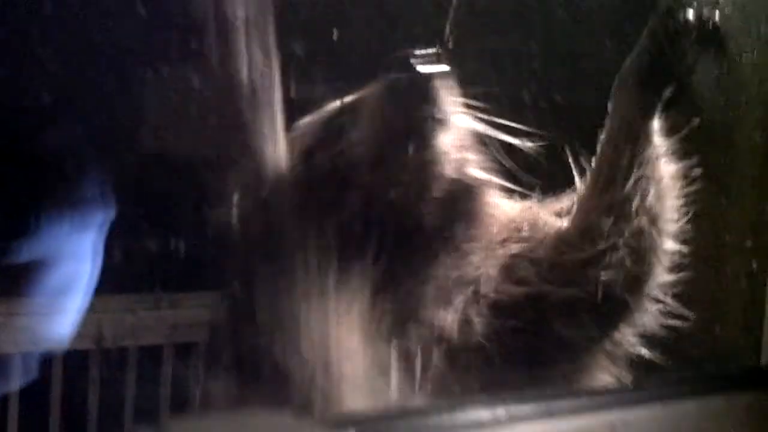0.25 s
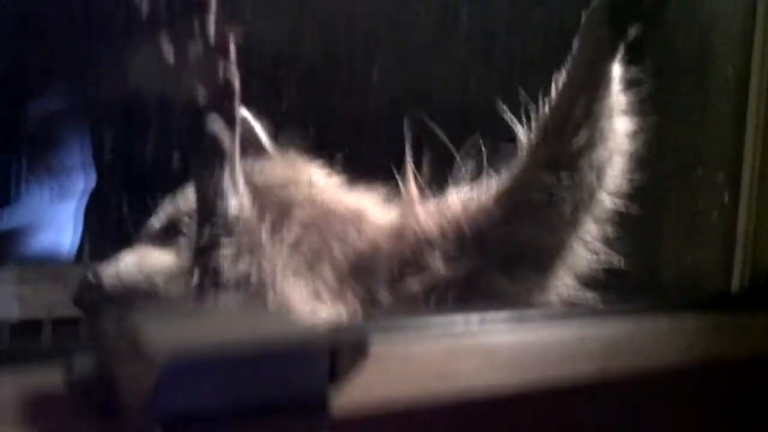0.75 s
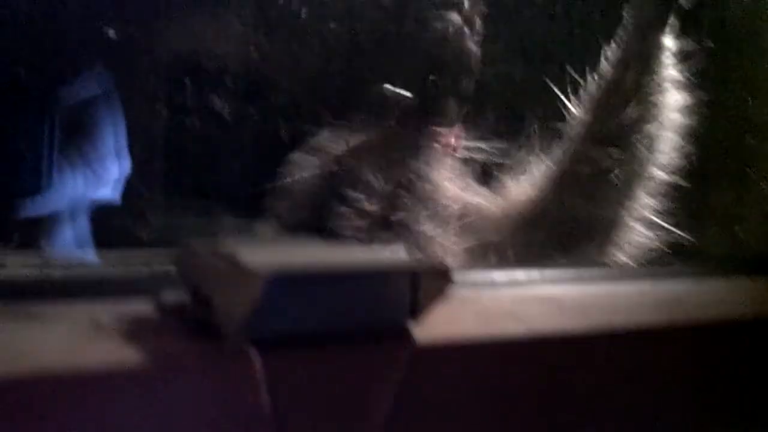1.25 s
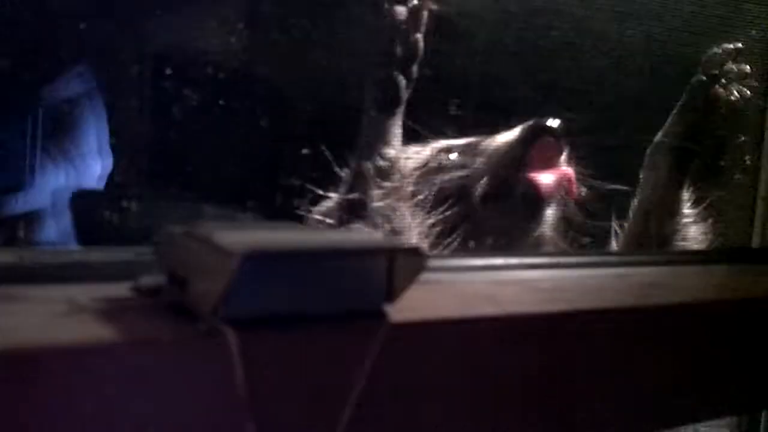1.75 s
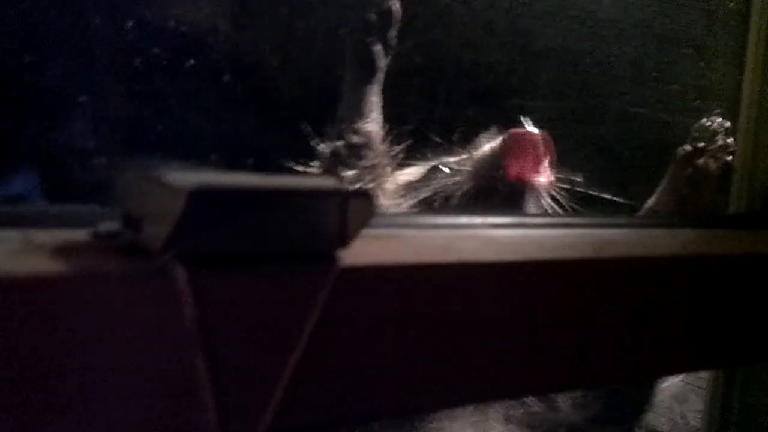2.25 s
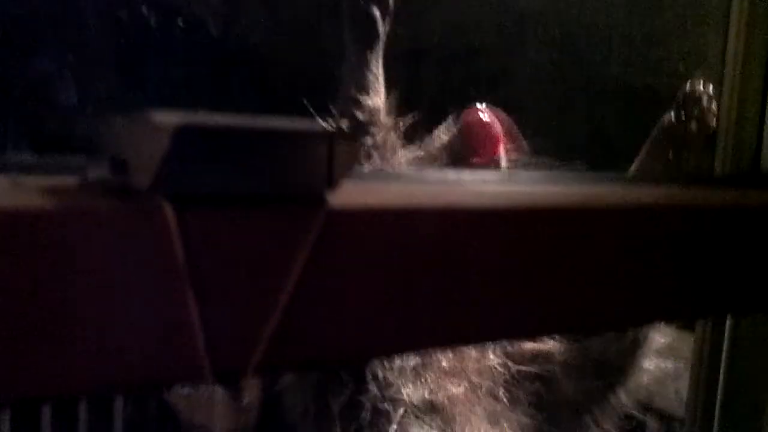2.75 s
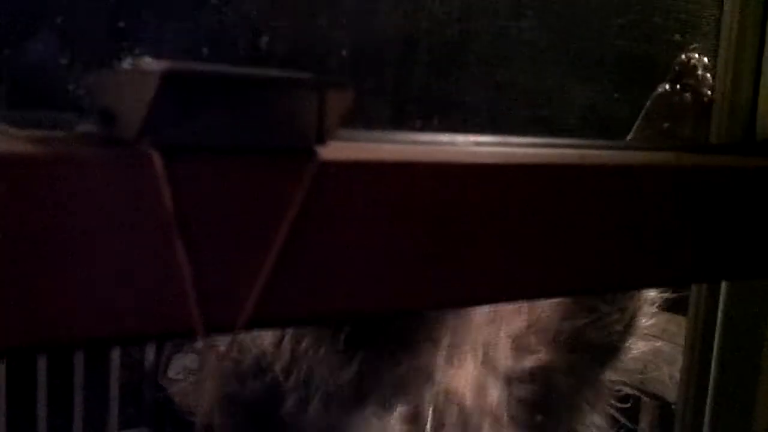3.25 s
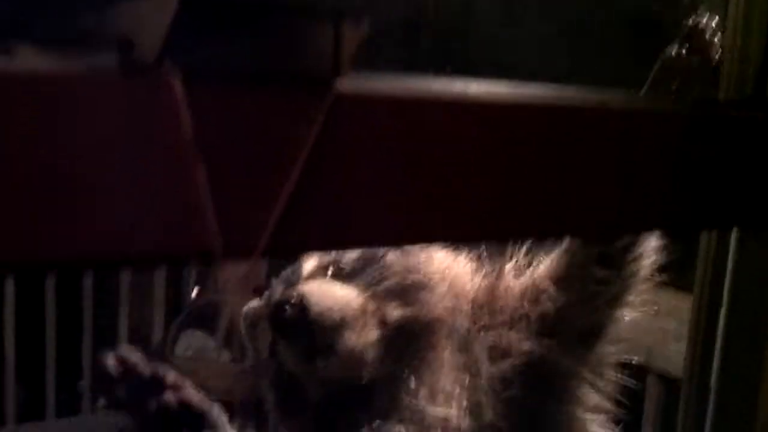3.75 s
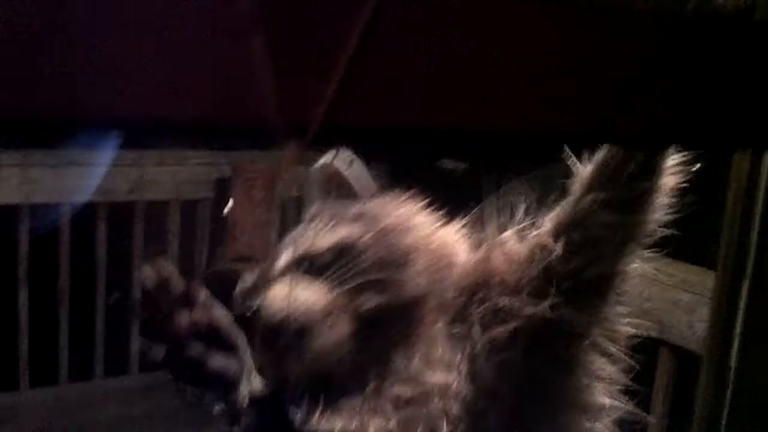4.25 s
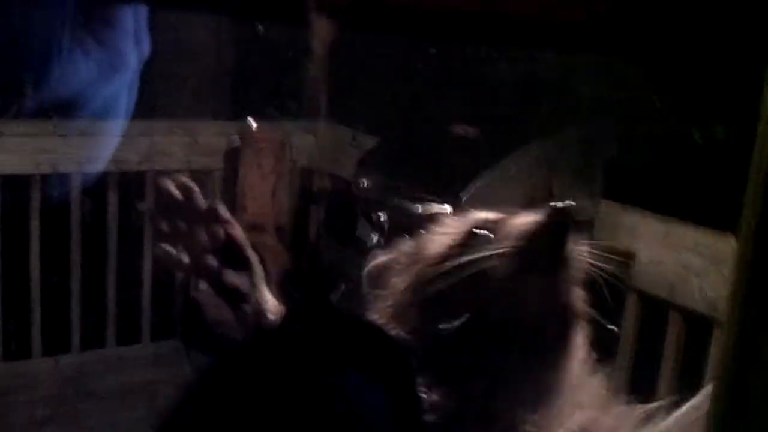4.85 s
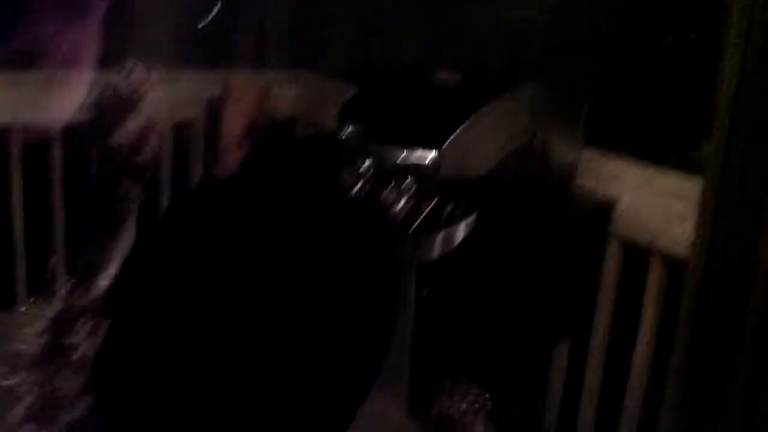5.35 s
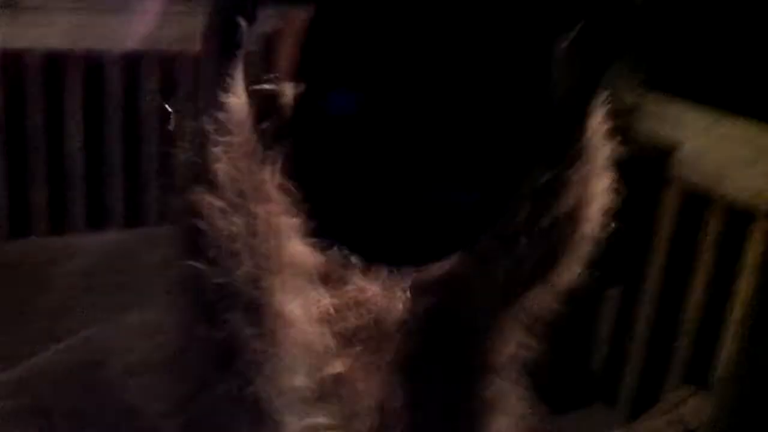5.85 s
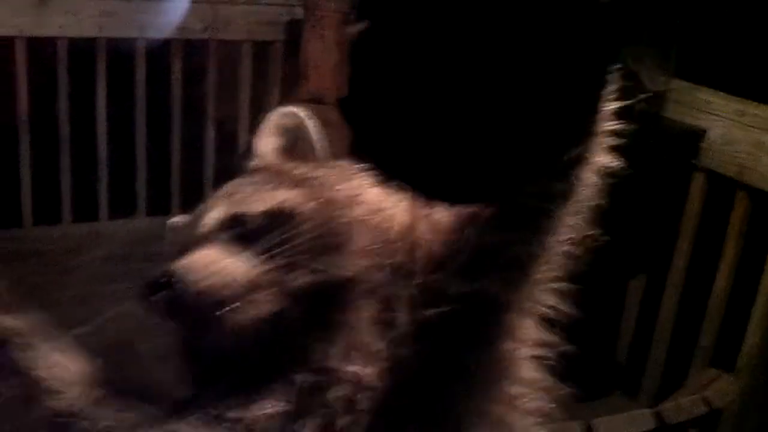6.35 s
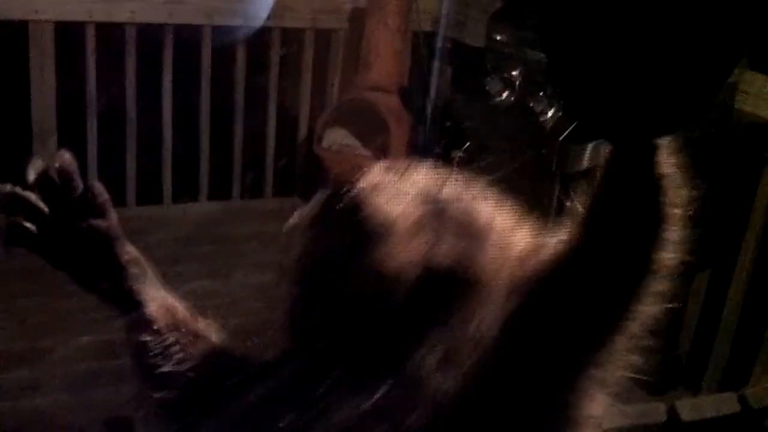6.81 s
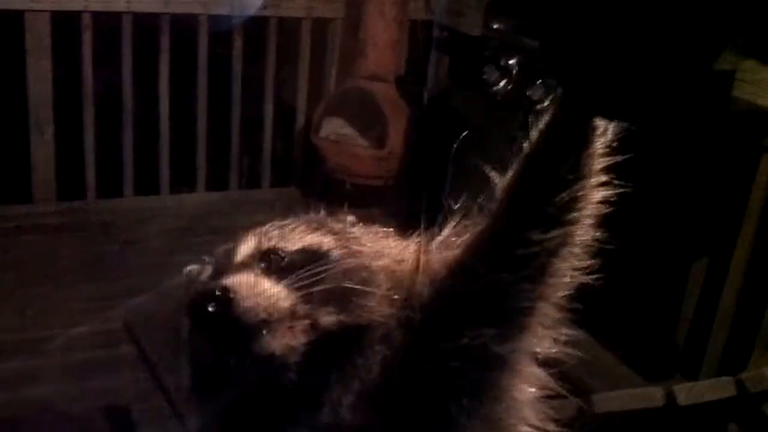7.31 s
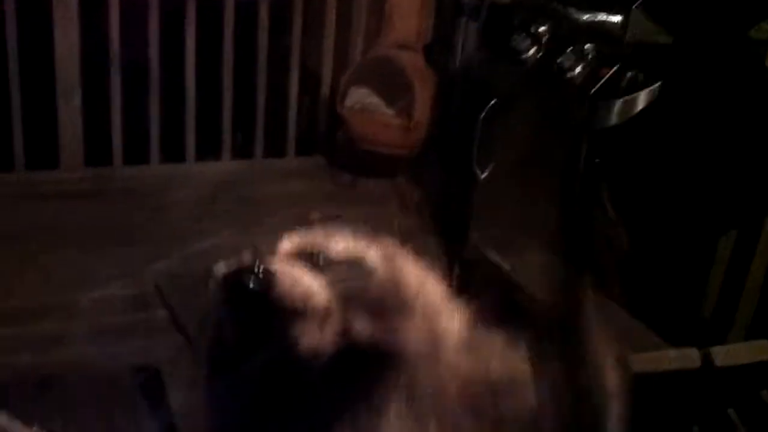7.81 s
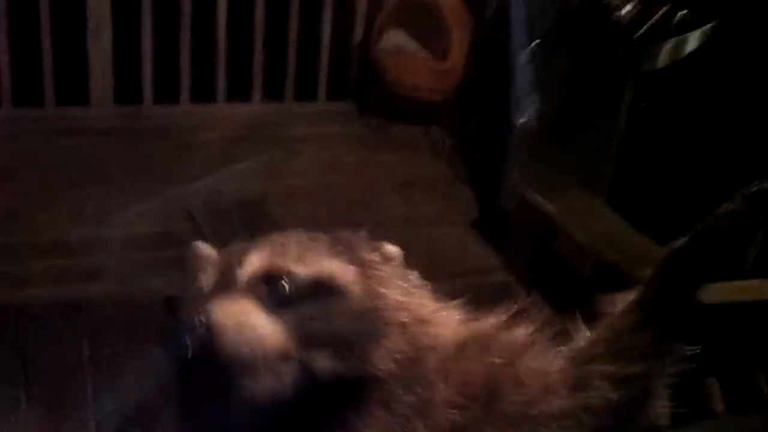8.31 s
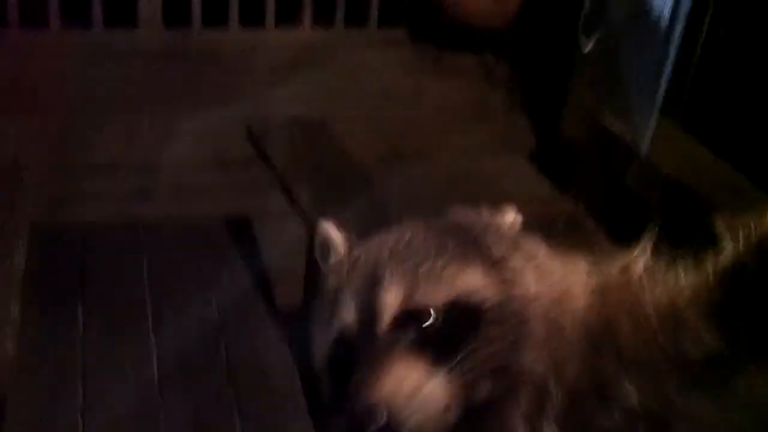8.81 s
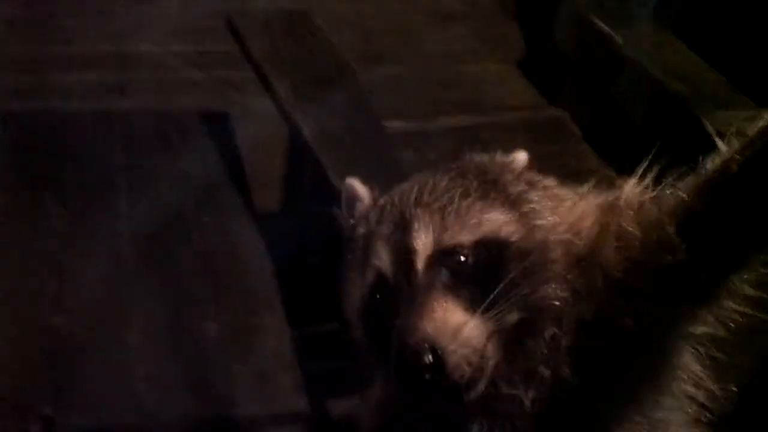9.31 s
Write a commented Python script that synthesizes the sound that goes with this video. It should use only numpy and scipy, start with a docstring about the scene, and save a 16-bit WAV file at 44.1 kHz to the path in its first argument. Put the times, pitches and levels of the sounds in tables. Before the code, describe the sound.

A raccoon paws at a plastic feeder by a window, heard in wide stereo from a room with a faint steady hum and hiss. Each touch is a sharp claw tick with a brief plastic ring, and the panel behind adds a dull knock and low thud. A light flurry of clicks fills the first 0.6 seconds. After a pause, irregular clicks return at about 1.2 seconds, with faint brushing between them. Around 2.5 seconds come rubs and three short, falling pad squeaks, followed by more tapping. The loudest stretch, from 4.8 to 5.3 seconds, brings hard scrapes, knocks and one stronger squeak. Lighter, sparser taps follow until about 6.6 seconds, when clicks and short rubs pick up again. They grow busy from 8 seconds and stop near 9.4, leaving the hum.

```python
"""A raccoon paws at a plastic feeder by a window at night, heard from a faintly humming room.
A short flurry of claw clicks comes first; after a pause the clicks return, then rubs and short squeaks.
Near five seconds the strokes are strongest, with one more squeak; clicks and rubs go on almost to the end.
Small pushes ring the plastic and tick the claws; the panel behind answers with a knock and a late, low thud.
A two-port microphone with stereo widening picks it all up."""
import sys
import numpy as np
from scipy import signal
from scipy.fft import rfft, irfft
from scipy.io import wavfile
from scipy.ndimage import uniform_filter1d

SR = 44100
rng = np.random.default_rng(int(sys.argv[2]) if len(sys.argv) > 2 else 0)


def write(x):
    x = np.atleast_2d(x).T
    wavfile.write(sys.argv[1], SR, np.round(np.clip(x, -1, 1) * 32767).astype(np.int16))


N = 422037  # length of the scene in samples
RING_N = 13000  # length of one ring in samples
AGE = np.arange(RING_N) / SR  # seconds since a ring began


def undb(db):
    """Turn decibels into gain."""
    return 10 ** (np.asarray(db) / 20)


def fade(t60):
    """Die away exponentially, by 60 dB in t60 seconds."""
    return np.exp(-np.log(1000) * AGE / t60)


def exposure(pair, db):
    """Scale a (common, difference) pair so the common part holds the energy of 10 ms at this level."""
    energy = np.sum(pair[0] ** 2)
    return pair * undb(db) * np.sqrt(SR / 10 ** 2 / energy)


def add(out, sound, start_s):
    """Mix a sound into out at its start time, cutting what runs past the end."""
    i = max(int(start_s * SR), 0)
    out[:, i:i + sound.shape[1]] += sound[:, :max(N - i, 0)]


def ports(pair):
    """Turn common and difference into left and right by sum and difference."""
    return np.array([pair[0] + pair[1], pair[0] - pair[1]])


def delay(x, samples):
    """Make a sound late by whole samples."""
    return np.concatenate([np.zeros(samples), x[:-samples]])


def resonance(x, hz, width_hz):
    """Favour one band of pitches, as a resonating body does; two passes give steep flanks."""
    b, a = signal.iirpeak(hz, hz / max(width_hz, 50), fs=SR)
    once = signal.lfilter(b, a, x)
    return signal.lfilter(b, a, once)


# room tone and microphone hiss:
# pitch_hz, common_db (dB per Hz), difference_db (between the ports, dB per Hz)
AIR_AND_HISS = [(30, -86, -99), (63, -78, -90), (126, -85.5, -84.5), (193, -79, -87.5), (373, -81.5, -87),
                (604, -91, -93), (1250, -99, -102), (2320, -104, -105), (4140, -110, -111),
                (6900, -115, -117), (11100, -117, -120), (12700, -113, -114), (15200, -109, -111)]


def air_and_hiss():
    """Steady noise of the air and microphone: white noise shaped to a loudness for each pitch."""
    hz, *columns = np.transpose(AIR_AND_HISS)
    log_f = np.log(np.arange(N // 2 + 1) * SR / N + 1)
    density_db = [np.interp(log_f, np.log(hz), column) for column in columns]
    gain = undb(density_db) * np.sqrt(SR / 2)
    return irfft(rfft(rng.standard_normal((2, N))) * gain, N)


# faint hum of the room: pitch_hz, level_db (before it wavers)
HUM_LINES = [(118.4, -60), (360.7, -63.5), (468.3, -67.5), (511.4, -73)]


def hum(waver_db=1.5, waver_rad=0.31):
    """Steady tones of the room whose level and phase waver slowly together."""
    out = np.zeros((2, N))
    t = np.arange(N) / SR
    for line_hz, level_db in HUM_LINES:
        waver = np.interp(t, np.linspace(0, t[-1], num=40), rng.standard_normal(size=40))
        gain = np.sqrt(2) * undb(level_db + waver_db * waver)
        out[0] += gain * np.sin(2 * np.pi * line_hz * t + waver_rad * waver)
    return out


# bending modes of the panel: pitch_hz (middle of a cluster), level_db (of its middle partner)
PANEL_MODES = [(102, -11.5), (140, 2.5), (203, -2.5), (238, -12.5), (304, -5.5), (361, -8.5), (409, -10),
               (498, -9), (592, -16), (703, -12.5), (795, -16.5), (900, -18), (1001, -16.5), (1100, -24),
               (1170, -18)]


def panel_modes(spread, t60_at_200, t60_slope, rise_at_200, rise_slope, room_db, room_t60, count=7):
    """Each mode is a cluster of close partners; low bending waves travel slowly, so they come late and stay."""
    hz, db = np.repeat(np.array(PANEL_MODES), count, axis=0).T
    offset = np.tile(np.linspace(-1, 1, count), len(PANEL_MODES))
    hz = hz * (1 + spread * (offset + 0.0915 * rng.standard_normal(len(hz))))
    db = db - 5 * offset ** 2  # the outer partners are weaker
    low = 200 / hz[:, None]  # above 1 for modes below 200 Hz
    swell = (1 - np.exp(-AGE / (rise_at_200 * low ** rise_slope))) ** 2
    decay = fade(t60_at_200 * low ** t60_slope) + undb(room_db) * fade(room_t60)
    waves = swell * decay * np.exp(2j * np.pi * hz[:, None] * AGE)
    waves *= (undb(db) / np.linalg.norm(waves, axis=1))[:, None]
    return np.tile(hz, 2), np.vstack([waves.real, waves.imag]).astype(np.float32)


def strike_panel(hz, waves, apart_hz, thud_top_hz=270):
    """Thud and knock: each contact weighs the modes anew; short waves differ more between the ports."""
    weights = rng.standard_normal((2, len(hz)))
    weights[1] *= np.minimum(hz / apart_hz, 1)
    low = hz < thud_top_hz
    both = np.vstack([weights * low, weights * ~low]).astype(np.float32)
    return np.split(both @ waves, 2)


# short-lived modes of the plastic: pitch_hz, level_db (against each other)
PLASTIC_MODES = [(1100, -2.5), (1400, 2), (1675, 5), (1850, -6), (2050, -2), (2250, 1)]


def plastic_modes(t60=0.061):
    """Sine and cosine ring of each plastic mode, all dying away quickly."""
    hz, db = np.transpose(PLASTIC_MODES)
    waves = undb(db)[:, None] * fade(t60) * np.exp(2j * np.pi * hz[:, None] * AGE)
    return np.vstack([waves.real, waves.imag])


def feeder_body():
    """The plastic and the panel that every touch sets ringing."""
    panel = panel_modes(spread=0.1192, t60_at_200=0.26, t60_slope=0.77, rise_at_200=0.0085,
                        rise_slope=1.88, room_db=-18, room_t60=0.46)
    return plastic_modes(), panel


def snap(scatter, t60, room_db, room_t60, side):
    """A sharp push, then its scatter inside the plastic and a faint room tail; (common, difference)."""
    pair = rng.standard_normal((2, RING_N)) * (fade(t60) + undb(room_db) * fade(room_t60))
    pair *= scatter / np.sqrt(np.sum(pair[0] ** 2))
    pair[1] *= side
    pair[0, 0] += 1
    return pair


def from_left(pair, lag_samples=3):
    """The feeder's ring reaches the left port slightly first, so the right one is delayed."""
    left, right = ports(pair)
    return ports([left, delay(right, lag_samples)]) / 2


def plastic_ring(plastic, ring_hz, width_hz, modes_db=-45.0):
    """A push scatters in the plastic and stirs its modes; the spot touched favours one region."""
    ring = snap(scatter=1.0, t60=0.026, room_db=-18, room_t60=.23, side=1.0)
    ring[0] += undb(modes_db) * rng.standard_normal(len(plastic)) @ plastic
    return from_left(resonance(ring, ring_hz, 1.253 * width_hz))  # each pass is wider than the pair


def claw_tick():
    """The claw rings in two broad bands; its hard tip adds a thin edge above them."""
    crack = snap(scatter=1.5, t60=0.056, room_db=-14.5, room_t60=0.27, side=1.12)
    lower = resonance(crack, 3860, 4150)
    upper = undb(-2) * resonance(crack, 5130, 1600)
    edge = undb(-14.0) * resonance(crack, 13800, 9300)
    return lower + upper + edge


def contact(force, body, ring_hz, width_hz, ring_db, knock_db, thud_db, tick_db):
    """A force drives the ring of the plastic, the knock and thud of the panel and the tick of the claw."""
    plastic, panel = body
    ring = plastic_ring(plastic, ring_hz, width_hz)
    tick = claw_tick()
    thud, knock = strike_panel(*panel, apart_hz=1980)
    parts = [(ring, ring_db), (knock, knock_db), (thud, thud_db), (tick, tick_db)]
    return sum(exposure(signal.fftconvolve(x, force[None], axes=1), db) for x, db in parts)


# A bare claw rings the plastic longest, at CLAW_HZ; the more pad touches,
# the lower and shorter the ring and the fuller the knock.
CLAW_HZ = 1710
RING_WIDTH_HZ, WIDEN_HZ_PER_OCTAVE = 556, 900  # before the ring's own widening; wider dies sooner
KNOCK_DB, KNOCK_DB_PER_OCTAVE = -0.2, 17  # over the strength; more as the ring falls
KNOCK_WEIGHT_SHARE = 0.22  # dB of knock for each dB of weight


def touch(force, body, strength_db, ring_hz, weight_db, bite_db):
    """The pitch of the ring tells how soft a contact is; softness and weight set its damping and its knock."""
    softness = np.log2(CLAW_HZ / ring_hz)  # octaves below a bare claw
    width_hz = RING_WIDTH_HZ + WIDEN_HZ_PER_OCTAVE * abs(softness)
    knock_db = KNOCK_DB + KNOCK_DB_PER_OCTAVE * softness + KNOCK_WEIGHT_SHARE * weight_db
    return contact(force, body, ring_hz, width_hz, ring_db=strength_db, knock_db=strength_db + knock_db,
                   thud_db=strength_db + weight_db, tick_db=strength_db + bite_db)


def stick_slip(length_s, slips_per_s, scatter_db, grips_per_s=110, grip_db=2.5):
    """Uneven little slips, in spurts as the paw grips and lets go."""
    n = int(length_s * SR)
    t = np.arange(n) / SR
    grip = np.interp(t * grips_per_s, np.arange(40), rng.standard_normal(size=40))
    chance, size = rng.random(RING_N)[:n], rng.standard_normal(RING_N)[:n]
    slips = (chance < slips_per_s / SR) * undb(scatter_db * size + grip_db * grip)
    swell = np.sqrt(np.sin(np.pi * t / length_s))
    return slips * swell + 1e-9  # never wholly silent, so it can be scaled


def brushing(body, count=14, softest_db=-63):
    """Faint brushing of fur and pads at random times: many dense little slips."""
    out = np.zeros((2, N))
    for when, pitch, pressure in rng.random((count, 3)):
        brush = stick_slip(0.036, slips_per_s=2100, scatter_db=1.5)
        strength_db = softest_db + 6 * pressure
        sound = touch(brush, body, strength_db, 1350 + 600 * pitch, weight_db=-3, bite_db=-16)
        add(out, sound, 1.2 + 8.2 * when)
    return out


def claws(spread_s=.006, follow=0.52, count=3):
    """One claw lands, then up to three weaker pushes within a few milliseconds."""
    force = np.zeros(int(spread_s * SR) + 1)
    later = (rng.random(count) * spread_s * SR).astype(int)
    force[later] = follow * rng.uniform(0.3, 1, count)  # follow is the strongest a later push can be
    force[0] = 1
    return force


def settling(body, count=14, middle_wait_s=.14, middle_db=-58.5, spread_db=5, low_hz=1400, high_hz=1800):
    """Light random touches that follow some of the strikes as the paw settles."""
    out = np.zeros((2, N))
    for which, wait, pitch, pressure in rng.random((count, 4)):
        strike_s = STRIKES[int(which * len(STRIKES))][0]
        wait_s = middle_wait_s * (.5 + wait)
        strength_db = middle_db + spread_db * (pressure - .5)
        ring_hz = low_hz + (high_hz - low_hz) * pitch
        add(out, touch(claws(), body, strength_db, ring_hz, weight_db=-1.5, bite_db=-22), strike_s + wait_s)
    return out


# a pad that sticks and slips in time: start_s, length_s, start_pitch_hz, end_pitch_hz, level_db
PAD_SQUEAKS = [(2.521, 0.035, 1867, 1186, -43.5), (2.546, 0.043, 1491, 1213, -36),
               (2.625, 0.0336, 1884, 1340, -47), (4.919, 0.079, 2440, 1799, -30)]


def squeaks():
    """Place each pad squeak at its time."""
    out = np.zeros((2, N))
    for start_s, *glide in PAD_SQUEAKS:
        add(out, squeak(*glide), start_s)
    return out


def squeak(length_s, start_hz, end_hz, level_db, wobble=0.182, rasp_db=-13):
    """A rough falling tone as the sliding pad slows; its overtones rasp in the claw's resonance."""
    n = int(length_s * SR)
    jitter = uniform_filter1d(rng.standard_normal(RING_N), size=50)[:n]
    pitch_hz = np.linspace(start_hz, end_hz, n) * (1 + wobble * jitter / jitter.std())
    phase = 2 * np.pi * np.cumsum(pitch_hz) / SR
    rasp = resonance(np.sin(2 * phase) + np.sin(3 * phase), 2900, 1700)
    tone = (np.sin(phase) + undb(rasp_db) * rasp) * np.hanning(n)
    body = snap(scatter=0.89, t60=0.034, room_db=-22, room_t60=.25, side=0.99)
    return exposure(signal.fftconvolve(body, tone[None], axes=1), level_db)


# a paw dragged along: start_s, length_s, strength_db, ring_pitch_hz,
# weight_db (thud of the panel, over the strength), bite_db (tick of the claw, over the strength)
DRAGS = [(.161, 0.042, -43.5, 1680, -1, -17), (2.454, .071, -45.5, 1600, 4, -13.5),
         (2.545, 0.055, -37, 1500, 6.5, -17.5), (2.66, 0.052, -40, 1480, 13.5, -13.5),
         (3.41, 0.038, -48.5, 1600, -1, -18), (4.11, 0.047, -42, 1610, 10, -9),
         (4.57, 0.11, -51.5, 1500, 11, -8), (4.698, .13, -53.5, 1640, 9, -8.5),
         (4.874, 0.13, -25, 2050, -41, -21.5), (4.968, 0.16, -28, 1920, -12, -13.5),
         (5.057, 0.13, -35.5, 1560, 14, -20), (5.172, 0.088, -28.5, 1760, -3, -23),
         (6.788, 0.074, -44, 1530, 19.5, -16), (6.865, 0.092, -42.5, 1450, 16, -17),
         (7.276, 0.037, -44, 1520, 9.5, -16), (7.644, .035, -45, 1470, 16, -25),
         (7.689, .12, -47.5, 1570, 13, -14), (7.973, 0.06, -49, 1570, 11.5, -13),
         (8.802, 0.064, -50, 1400, 14.5, -17), (9.297, .084, -46, 1530, 7, -14)]


def drags(body):
    """A dragged paw sticks and slips, and each slip pushes the plastic and the panel."""
    out = np.zeros((2, N))
    for start_s, length_s, *drag in DRAGS:
        slips = stick_slip(length_s, slips_per_s=800, scatter_db=4.0)
        add(out, touch(slips, body, *drag), start_s)
    return out


# claw and paw strikes: start_s, strength_db, ring_pitch_hz,
# weight_db (thud of the panel, over the strength), bite_db (tick of the claw tip, over the strength)
STRIKES = [(.029, -48, 1680, 6, -11.5), (.118, -47, 1600, -3, -32), (.165, -52, 1810, 7, -14),
           (0.2141, -43.5, 1700, 13, -21), (0.2963, -50, 1150, 22.5, -23), (0.3892, -40, 1790, 2, -20),
           (0.393, -43, 1750, 10.5, -17), (.457, -50.5, 1570, -10, -10.5), (0.5101, -42.5, 1360, 3, -18),
           (.522, -47.5, 1520, 4, -13), (0.556, -54, 1570, 15, -14), (1.181, -41.5, 1520, 11.5, -14),
           (1.2414, -50.5, 1660, 1, -23), (1.3238, -45, 1680, 4.5, -22), (1.387, -51, 1680, -9, -19),
           (1.4752, -34, 1700, 0, -17), (1.496, -38.5, 1580, -20, -17), (1.51, -37, 1650, 2, -26),
           (1.6487, -48, 1710, 0, -18), (1.7647, -51, 1540, 4, -10.5), (1.8874, -37.5, 1650, 6, -22.5),
           (1.9759, -55.5, 1510, 13, -22), (2.018, -52.5, 1600, -3, -21), (2.1578, -38.5, 1610, -6, -14),
           (2.1755, -42.5, 1700, 9, -21), (2.2859, -45.5, 1840, -2, -15), (2.2945, -34, 1590, 0, -21),
           (2.4406, -54, 1520, -12, -10.5), (2.6522, -44, 1280, 17.5, -10), (2.6933, -52, 1350, 25, -26),
           (2.745, -49.5, 1350, 11, -26), (2.7767, -33.5, 1610, -3, -19.5), (2.7954, -41.5, 1550, -8, -28),
           (2.8462, -43, 1590, -3, -30), (2.8946, -40, 1580, 0, -20), (2.9646, -46.5, 1450, -7, -26),
           (3.031, -44, 1570, -13, -24), (3.0399, -44, 1590, 12.5, -18), (3.3114, -41.5, 1700, 7, -22),
           (3.3249, -46, 1520, 13, -14.5), (3.3448, -43.5, 1660, -2, -23), (3.407, -49.5, 1660, 16.5, -17),
           (3.4489, -42, 1740, 1, -24), (3.5868, -43.5, 1610, 12, -18), (3.6684, -52, 1720, 12, -21),
           (3.705, -43.5, 1700, 7, -14.5), (3.7528, -38.5, 1740, -13, -22), (3.7576, -36.5, 1720, -25, -24),
           (3.7901, -54.5, 1360, 22.5, -20), (3.9456, -36.5, 1450, 2, -12), (4.007, -38, 1480, 1.5, -14.5),
           (4.022, -44.5, 1540, 2, -22), (4.1637, -47.5, 1610, 10, -8.5), (4.364, -41, 1600, 2.5, -10.5),
           (4.3827, -42.5, 1730, -8, -9.5), (4.406, -44, 1700, 1, -13), (4.4205, -46, 1650, 7, -11.5),
           (4.7468, -51.5, 1820, -8, -11), (4.8339, -31, 1670, 7, -17), (4.864, -33.5, 1260, 15.5, -16),
           (4.9024, -35, 1600, 1, -8), (5.0358, -34, 1640, -5, -34), (5.0707, -34, 1550, 17, -11.5),
           (5.0947, -36.5, 1330, 5, -6), (5.1248, -31.5, 1580, 14, -10.5), (5.1474, -33, 1230, 2, -22),
           (5.1543, -32, 1240, 9, -16), (5.195, -35.5, 1600, 13.5, -11.5), (5.2214, -22.5, 1630, -28, -16),
           (5.2409, -39, 1410, -7, -28), (5.38, -53.5, 1530, 2, -30), (5.3975, -47.5, 1680, 5.5, -20),
           (5.4641, -48, 1600, -1, -26), (5.5022, -46.5, 1700, 1, -14.5), (5.597, -52.5, 1600, -16, -22),
           (5.6498, -55.5, 1540, 7, -26), (5.7042, -47.5, 1710, 7, -21), (5.7338, -41, 1100, 15.5, -18),
           (5.7561, -43, 1140, 3, -19), (5.9041, -49, 1680, 2, -13.5), (5.9235, -50, 1500, 17, -19),
           (6.126, -48, 1490, 19.5, -14), (6.144, -41.5, 1510, -13, -15), (6.4443, -53, 1630, 18, -13),
           (6.6291, -41, 1670, 0.5, -12), (6.779, -42, 1660, 14, -12), (6.7868, -38.5, 1660, 2, -14),
           (6.96, -35.5, 1530, 7, -21), (7.054, -41, 1610, -2, -23), (7.1846, -37, 1610, -18, -19),
           (7.1926, -42, 1570, 11, -11.5), (7.2971, -49, 1500, -3, -13), (7.5091, -54.5, 1860, 5, -26),
           (7.6067, -36, 1570, 1, -14), (7.644, -39, 1340, -22, -17), (7.6863, -45, 1400, -1, -20),
           (7.8671, -54, 1220, 19.5, -20), (7.935, -57.5, 1160, 12, -24), (8.096, -56, 1300, 28, -20),
           (8.1339, -39.5, 1410, 14.5, -19), (8.1538, -40, 1440, 6, -18), (8.1706, -50, 1300, -3, -19),
           (8.2034, -47, 1400, 10, -26), (8.2195, -50.5, 1800, 12, -18), (8.3096, -32.5, 1610, -8, -16),
           (8.39, -37, 1480, 5, -15), (8.4048, -38.5, 1500, 13.5, -9.5), (8.4203, -40.5, 1690, 1, -18),
           (8.528, -36, 1860, 3, -13.5), (8.61, -48, 1480, -10, -10), (8.6254, -38.5, 1510, 2, -13.5),
           (8.6442, -40, 1850, 3, -16), (8.7147, -37.5, 1490, 4.5, -23), (8.7732, -49, 1640, 15, -13),
           (8.875, -34.5, 1700, -19, -19.5), (8.889, -37.5, 1720, 2, -14), (8.9545, -42.5, 1680, 13.5, -9),
           (8.9967, -51, 1700, 17, -23), (9.028, -37.5, 1640, -16, -15), (9.0395, -38, 1520, -13, -16.5),
           (9.0949, -43, 1840, 0, -16), (9.1764, -45, 1490, 21, -12), (9.1862, -32, 1690, -24, -14.5),
           (9.3664, -46, 2130, 5, -14)]


def strikes(body):
    """Each strike is a quick group of claw pushes that rings the plastic and thuds the panel."""
    out = np.zeros((2, N))
    for start_s, *blow in STRIKES:
        add(out, touch(claws(), body, *blow), start_s)
    return out


def scene(right_db=-2.0):
    """Room and paws at the two ports; the right port is a little less sensitive."""
    body = feeder_body()
    room = air_and_hiss() + hum()
    paws = brushing(body) + settling(body) + squeaks() + drags(body) + strikes(body)
    return ports(room + paws) * undb([[0], [right_db]])


def record(dry, cross_lag_samples=16, top_hz=15850):
    """Stereo widening subtracts each port, delayed, from the other channel; the top is cut."""
    crossed = np.array([delay(port, cross_lag_samples) for port in dry[::-1]])
    wide = dry - crossed
    top_cut = signal.ellip(10, .2, 70, top_hz, fs=SR, output="sos")
    return signal.sosfilt(top_cut, wide)


dry = scene()
out = record(dry)
write(out)
```